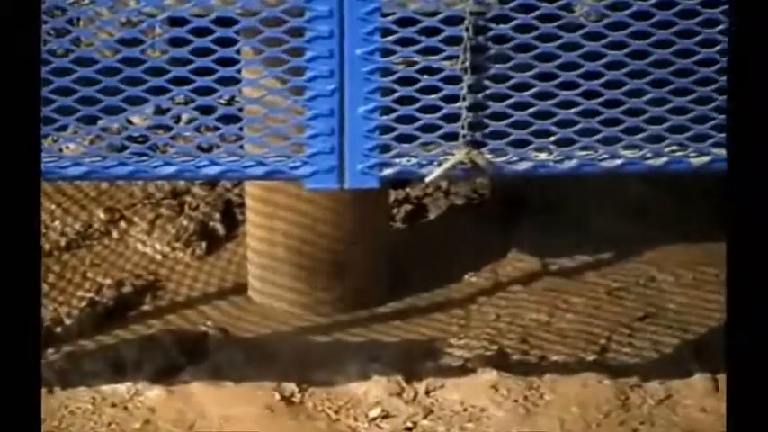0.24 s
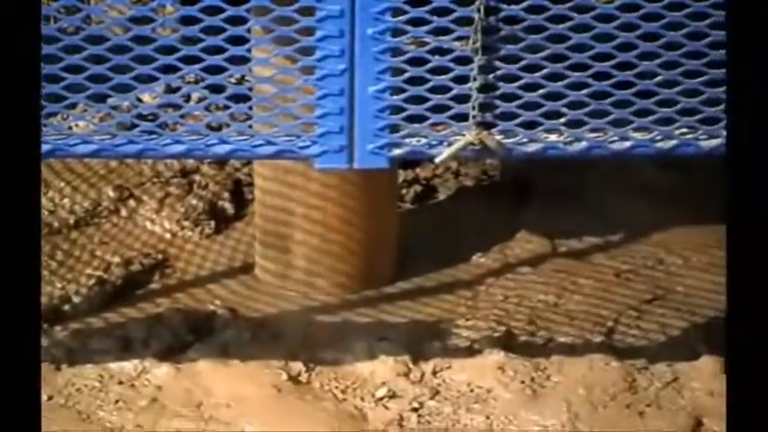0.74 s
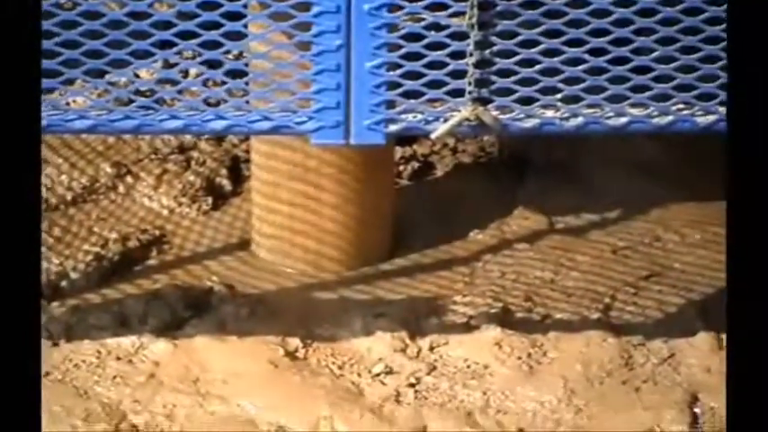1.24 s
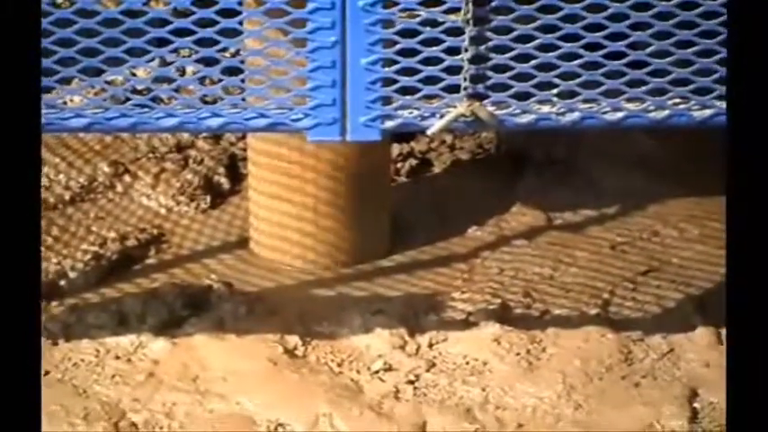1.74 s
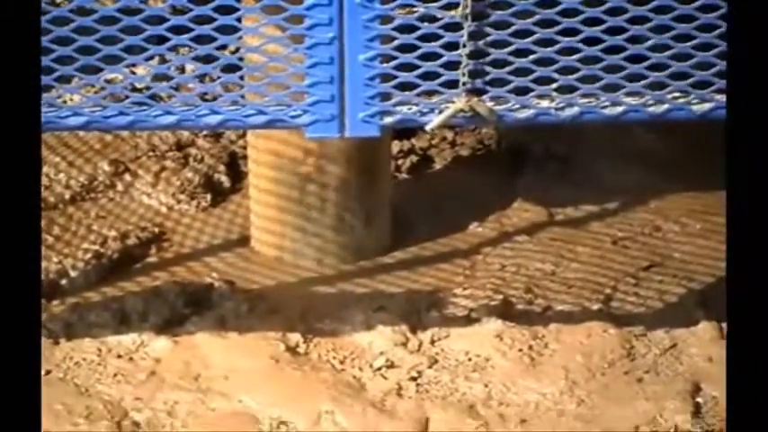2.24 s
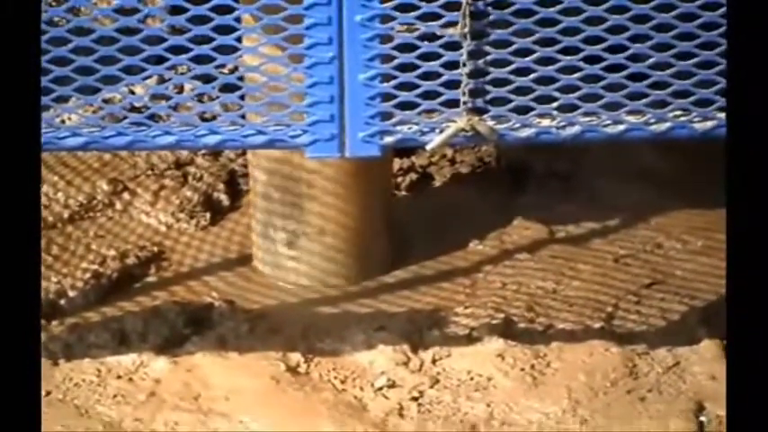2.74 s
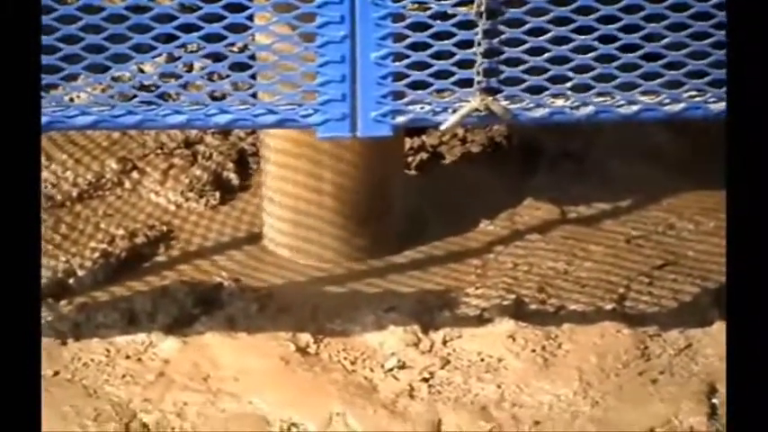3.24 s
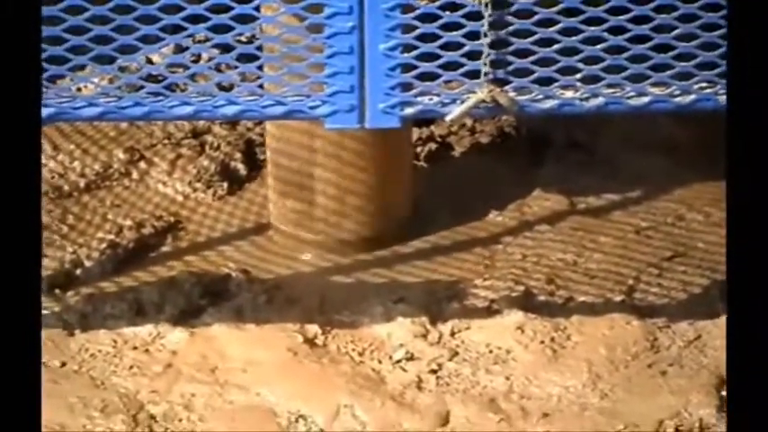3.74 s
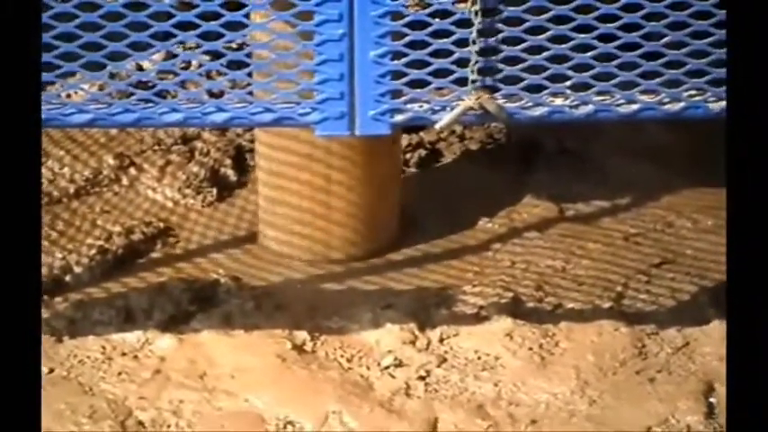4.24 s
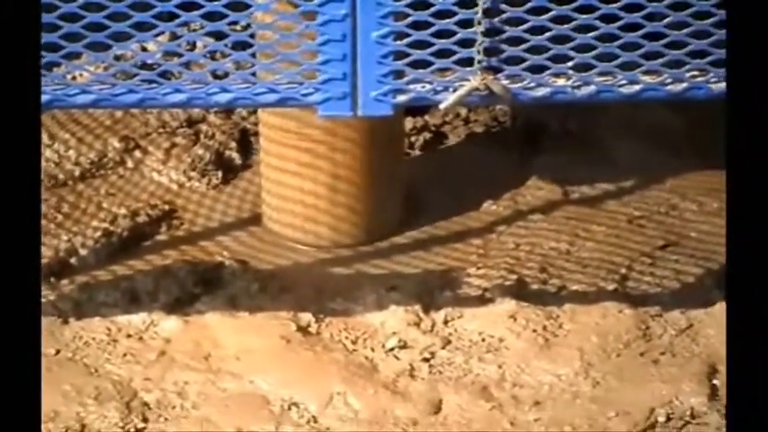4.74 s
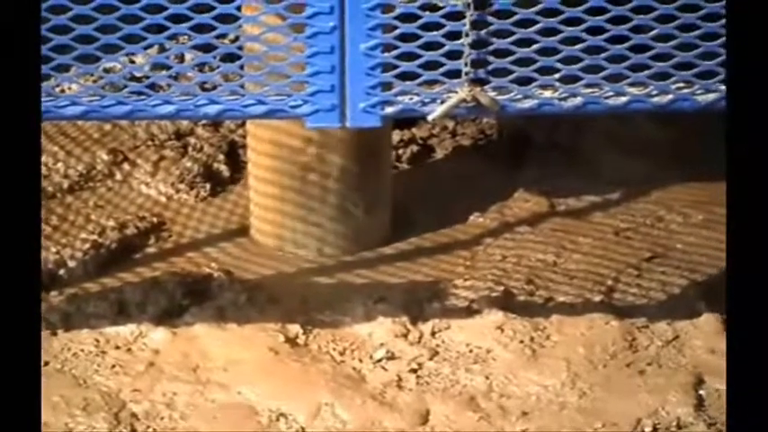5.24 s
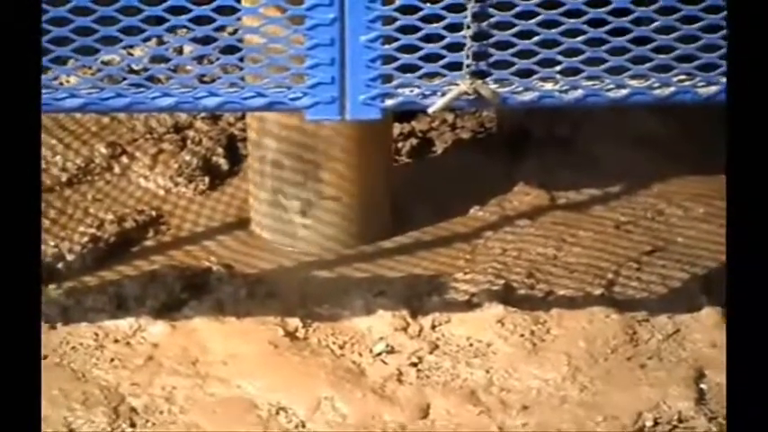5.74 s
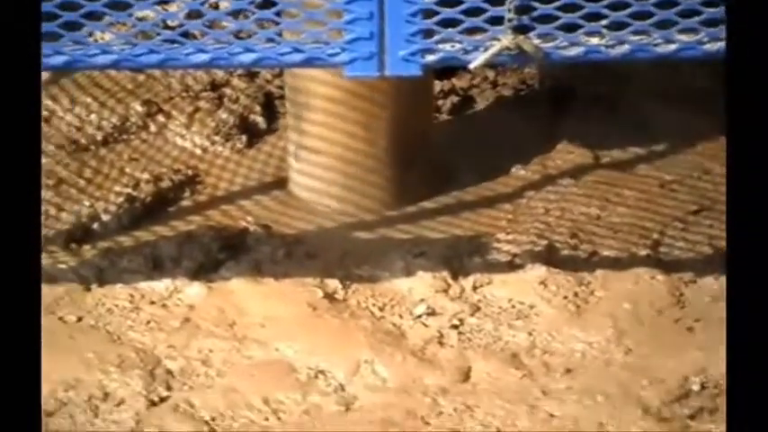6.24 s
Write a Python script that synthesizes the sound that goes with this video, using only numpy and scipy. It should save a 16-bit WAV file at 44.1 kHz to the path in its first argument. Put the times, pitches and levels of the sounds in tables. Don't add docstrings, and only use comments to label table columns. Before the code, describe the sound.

Outdoor drilling machinery heard fairly close on one microphone, starting suddenly after short silence. The diesel holds a constant low hum while rotary gears and a faltering hydraulic whine climb slightly, then fall back. Fluttering metallic roar and airy fan hiss fill the background. Soft casing knocks, tiny steel ticks and scratchy scuffs appear, then strong low wind bumps make the sound dip and recover.

```python
import sys
import numpy as np
from scipy import signal
from scipy.fft import rfft, irfft, next_fast_len
from scipy.io import wavfile

SR = 44100
rng = np.random.default_rng(int(sys.argv[2]) if len(sys.argv) > 2 else 0)


def to_wav(sig):
    pcm = np.clip(np.atleast_2d(sig), -1, 1) * 32767
    pcm = np.round(pcm).astype(np.int16)
    wavfile.write(sys.argv[1], SR, pcm.T)


def ratio_of_db(decibels):
    return 10 ** (np.asarray(decibels, float) / 20)


N = 286209


def rms_one(x):
    return x / np.sqrt(np.mean(x ** 2) + 1e-20)


def in_time(rows):
    s, *columns = np.transpose(rows)
    return [np.interp(np.arange(N) / SR, s, c) for c in columns]


def drift(rate):
    r = np.exp(-80 * np.pi * rate / SR)
    noise = rng.standard_normal(N // 40 + 2002)
    slow = signal.lfilter([1], [1, -2 * r, r * r], noise)[2000:]
    return np.interp(np.arange(N) / 40, np.arange(len(slow)), rms_one(slow))


def resonate(x, hz, width_hz):
    r = np.exp(-np.pi * width_hz / SR)
    feedback = [1, -2 * r * np.cos(2 * np.pi * hz / SR), r * r]
    return signal.lfilter([(1 - r * r) / 2, 0, (r * r - 1) / 2], feedback, x)


def narrow(rings):
    white = rng.standard_normal(N)
    out = np.zeros(N)
    for hz, width, db in rings:
        out += ratio_of_db(db) * rms_one(resonate(resonate(white, hz, width), hz, width))
    return out


def shape(points, size):
    hz, db = np.transpose(points)
    grid_hz = np.arange(size // 2 + 1) * SR / size + 1e-3
    return ratio_of_db(np.interp(np.log(grid_hz), np.log(hz), db, left=-90, right=-120))


def coloured(spectrum, low_hz, high_hz):
    size = next_fast_len(N)
    spec = shape(spectrum, size) * rfft(rng.standard_normal(size))
    inside = slice(round(low_hz * size / SR), round(high_hz * size / SR))
    return irfft(spec, size)[:N] * size / np.sqrt(2 * np.sum(np.abs(spec[inside]) ** 2))


def line(hz, level_db, waver_db, rate=5.8, slip=0.21):
    turns = np.cumsum(hz * np.ones(N)) / SR + rng.random()
    phase = 2 * np.pi * turns + slip * waver_db * drift(rate)
    strength = rms_one(ratio_of_db(waver_db * drift(rate)))
    return np.sqrt(2) * ratio_of_db(level_db) * strength * np.sin(phase)


def drive():
    # (time [s], gear mesh [Hz], mesh [dB rms], octave [dB rms], pump whine [dB rms])
    drive_curve = [(.4, 254.6, -21, -46, -30.5), (1.1, 255.5, -20, -52, -27),
                   (1.3, 254.2, -20.5, -40, -29.5), (2.2, 254.5, -20.5, -36.5, -32.5),
                   (2.6, 254.4, -21.5, -38, -31), (2.8, 258.6, -19, -39, -24.5),
                   (3.0, 263.4, -19.5, -34, -30), (3.4, 267.3, -19.5, -36.5, -40),
                   (3.75, 269.3, -20, -35.5, -37), (3.9, 271.5, -17.5, -46.5, -41),
                   (4.2, 274.5, -21.5, -40, -33), (4.5, 267, -21, -35, -33.5),
                   (4.9, 258.8, -20.5, -34, -28), (5.1, 255, -21, -49, -29.5), (5.6, 255, -21.5, -48, -30),
                   (6.45, 254.3, -22, -45.5, -27)]
    # (multiple of mesh, level [dB rms], waver [dB])
    shaft_lines = [(0.2939, -28, 1.5), (.421, -40, -5), (.59, -45.5, 1.5), (.874, -34, 4.5),
                   (1.181, -33.5, 2.5), (1.28, -41.5, 6.5)]
    # (time [s], share lost)
    falters = [(.59, .85), (1.21, .6), (1.58, .8), (2.19, .8), (2.86, .7), (3.2, .6), (5.02, .7),
               (5.34, .7), (5.94, .9), (6.22, .8), (6.37, .6)]
    falter_s = .045
    mesh_hz, mesh_db, octave_db, whine_db = in_time(drive_curve)
    out = line(mesh_hz, mesh_db, 0.88, rate=12.0, slip=0.084)
    out += line(2 * mesh_hz, octave_db, 2.0, slip=0.11)
    for multiple, db, waver_db in shaft_lines:
        out += line(multiple * mesh_hz, db, waver_db, slip=0.15)
    shaft_turns = np.cumsum(.01289 * mesh_hz) / SR
    throb = 1 - .35 * np.cos(2 * np.pi * (shaft_turns - .9))
    for s, lost in falters:
        throb = throb * (1 - lost * np.exp(-((np.arange(N) / SR - s) / falter_s) ** 2))
    return out + throb * line(2.374 * mesh_hz, whine_db, 1.7, rate=14.0, slip=0.2)


def diesel():
    # (frequency [Hz], level [dB rms], waver [dB])
    diesel_lines = [(60.0, -22.5, .8), (201, -37, 4), (842, -45, 6), (1003, -45, 6), (1090, -48, 6),
                    (1154, -47, 5), (1207, -47, 6)]
    return sum(line(hz, db, waver_db) for hz, db, waver_db in diesel_lines)


def roar():
    # (time [s], level above the mean [dB])
    roar_curve = [(.4, 0.55), (2.6, 1.03), (3.4, 1.16), (3.95, 2.5), (4.4, 2.5), (4.6, 1), (5.06, -0.5),
                  (5.6, -1.4), (6.0, -1.5), (6.45, -0.4)]
    # (time [s], level above the mean [dB])
    whistle_curve = [(.3, 1.5), (2.4, 1.5), (2.8, -5), (4.1, -8), (4.4, 0), (6.49, 1.5)]
    # (frequency [Hz], level [dB per Hz])
    body_colour = [(20, -6.5), (50, -6), (100, -11.5), (170, -17.5), (260, 4.5), (350, -7), (480, -4.5),
                   (540, -9.5), (640, -3.5), (780, -4), (950, -9), (1400, -10), (1750, -21.5), (3000, -32)]
    # (frequency [Hz], level [dB per Hz])
    hiss_colour = [(1000, -34.5), (1600, -2.5), (1750, -3.5), (2100, -2), (2890, -8), (3340, -9),
                   (3790, -13.5), (4650, -17), (5350, -16.5), (6500, -20), (8500, -36.5)]
    # (frequency [Hz], level [dB per Hz])
    air_colour = [(5000, -17), (6800, -4), (7800, -1), (9400, -3.5), (14000, -2.5)]
    # (frequency [Hz], width [Hz], level [dB rms])
    casing_rings = [(1310, 60, -46), (2010, 40, -53), (2206, 40, -51), (2488, 30, -54), (2610, 50, -55),
                    (3310, 50, -57), (3450, 60, -61)]
    # (frequency [Hz], width [Hz], level [dB rms])
    fan_whistles = [(8049, 70, -68), (8225, 70, -66), (8380, 70, -68), (9370, 100, -73), (10200, 120, -71),
                    (11810, 200, -72)]
    hiss_follows = 0.87
    (roar_db,), (whistle_db,) = in_time(roar_curve), in_time(whistle_curve)
    body = ratio_of_db(-29.5 + roar_db + 0.9 * drift(32.0)) * coloured(body_colour, 650, 2500)
    hiss_db = -44.5 + hiss_follows * roar_db
    hiss = ratio_of_db(hiss_db + 0.77 * drift(40.0)) * coloured(hiss_colour, 2880, 6500)
    air_db = -55.5 + .7 * roar_db + 0.49 * whistle_db
    air = ratio_of_db(air_db + 0.44 * drift(40.0)) * coloured(air_colour, 7100, 10800)
    rings = ratio_of_db(hiss_follows * roar_db) * narrow(casing_rings)
    return body + hiss + air + rings + ratio_of_db(whistle_db) * narrow(fan_whistles)


def wind():
    # (centre [s], half length [s], peak [dB])
    gust_events = [(0.326, 0.045, -22), (.47, .025, -29.5), (1.657, .025, -26.5), (1.848, .03, -28),
                   (2.002, .045, -22), (3.455, 0.041, -38.5), (4.53, .05, -18), (4.682, .06, -19),
                   (4.937, .015, -25.5), (5.069, 0.038, -17.5), (5.189, 0.022, -21), (5.228, 0.015, -12),
                   (5.345, 0.027, -25), (5.42, 0.06, -23), (5.563, 0.079, -28), (5.73, .04, -22),
                   (5.86, .06, -23.5), (6.028, .03, -31), (6.194, 0.029, -22), (6.45, .02, -32.5)]
    # (centre [s], peak [dB], pitch [Hz])
    puffs = [(4.451, -5.5, 318), (4.492, -8.5, 152), (4.552, -8.5, 200.5), (4.603, -7.5, 150),
             (4.667, -7.5, 202), (4.719, -12, 130), (5.066, -9, 180), (5.087, -6.5, 700), (5.202, -6, 420),
             (5.229, -0.5, 198), (5.233, -9.5, 400), (5.41, -15, 200.3), (5.741, -10, 253),
             (6.457, -17.5, 130), (5.347, -11.5, 140)]
    t = np.arange(N) / SR
    strength = ratio_of_db(-35 + 2 * drift(10.0))
    for s, half, db in gust_events:
        strength += ratio_of_db(db) * np.exp(-((t - s) / half) ** 2)
    rumble = coloured([(20, -2.5), (80, 1), (180, -2.5), (400, -13), (1000, -24)], 97, 190)
    out = strength * ratio_of_db(-3.5 + 2.6 * drift(33.0)) * rumble
    for s, db, hz in puffs:
        cycles = np.arange(-round(2 * SR / hz), round(2 * SR / hz)) * hz / SR
        swing = -np.sin(2 * np.pi * cycles) * np.exp(-2.5 * cycles ** 2)
        out[round((s - 2 / hz) * SR):][:len(swing)] += ratio_of_db(db) * swing
    return out


def knocks():
    # (time [s], peak [dB], frequency [Hz], fall by 60 dB [s])
    blows = [
        (.92, -20.5, 427, 0.11),
        (2.775, -17, 319, .08),
        (3.96, -16, 428, 0.14),
        (4.42, -18.5, 762, 0.17),
        (4.82, -19, 394, .2),
    ]
    out = np.zeros(N)
    for s, db, hz, t60 in blows:
        t = np.arange(round(t60 * SR)) / SR
        soft_start = np.clip(t / 0.0046, 0, 1)
        out[round(s * SR):][:len(t)] += ratio_of_db(db - 60 * t / t60) * soft_start * np.sin(2 * np.pi * hz * t)
    return out


def ticks():
    # (time [s], peak [dB], loss away from the main tone [dB per octave])
    strikes = [
        (.9612, -11.5, 0),
        (1.2017, -24, 25),
    ]
    # (frequency [Hz], level [dB], fall by 60 dB [s])
    steel_modes = [(3000, -7, .005), (5400, 0, .0035), (7100, 1, .0014), (9300, 1, .0014),
                   (12300, 1, .0014)]
    main_hz = steel_modes[1][0]
    out = np.zeros(N)
    for hz, mode_db, t60 in steel_modes:
        clicks = np.full(N, 1e-18)
        for s, db, loss_db in strikes:
            clicks[round(s * SR)] = ratio_of_db(db + mode_db - loss_db * abs(np.log2(hz / main_hz)))
        r, w = ratio_of_db(-60 / (t60 * SR)), 2 * np.pi * hz / SR
        out += signal.lfilter([0, np.sin(w)], [1, -2 * r * np.cos(w), r * r], clicks)
    return out


def scuffs():
    # (time [s], length [s], knock [dB rms], rasp [dB rms],
    # tilt from rasp to scratch and again to sizzle [dB])
    strokes = [(2.59, .045, -60, -55, 2.5), (2.76, .033, -25, -37, -5.5), (2.862, .018, -50, -45, -1.5),
               (3.138, .02, -38, -50, -6), (3.70, .025, -45, -43, -1.5), (3.735, .012, -38, -46, -8),
               (3.778, .022, -37, -40, -5), (3.80, .025, -45, -45, -.3), (3.845, .022, -50, -46, -.3),
               (3.955, .028, -28, -40, -12), (4.045, .028, -27, -42, -8), (4.186, .02, -36, -50, -7),
               (4.30, .04, -60, -58, 2.5), (4.47, .04, -33, -50, -5), (5.085, .006, -24, -48, -10),
               (5.231, .006, -26, -43, -8)]
    # (frequency [Hz], width [Hz], level [dB])
    groups = [
        [(1260, 250, 0), (2170, 350, -3)],
        [(3600, 1800, 0)],
        [(5300, 1800, 1.5)],
        [(7300, 4500, 0), (12000, 3000, -8)],
    ]
    grit = rng.standard_normal(N) * ratio_of_db(0.94 * rng.exponential(1, N))
    rung = []
    for group in groups:
        band = np.zeros(N)
        for hz, width, db in group:
            band += ratio_of_db(db) * rms_one(resonate(resonate(grit, hz, width), hz, width))
        rung.append(band)
    out = np.zeros(N)
    for s, length, knock_db, rasp_db, tilt_db in strokes:
        levels_db = knock_db, rasp_db, rasp_db + tilt_db, rasp_db + 2 * tilt_db - 2
        t = np.arange(round(2 * length * SR)) / SR
        stroke = 1.35 * np.clip(t / .002, 0, 1) * np.exp(-(t / length) ** 3)
        part = slice(round(s * SR), round(s * SR) + len(t))
        out[part] += stroke * sum(ratio_of_db(db) * rms_one(band[part]) for db, band in zip(levels_db, rung))
    return out


def scene():
    return (drive() + diesel() + roar() + wind() + knocks() + ticks() + scuffs())[None]


def roll_off(x):
    return signal.sosfilt(signal.butter(12, 13810, fs=SR, output="sos"), x)


def record(dry):
    # (time [s], level [dB], recovery [s])
    ducks = [
        (4.494, -2, 0.5),
        (5.236, -3.5, 0.38),
    ]
    # (frequency [Hz], level [dB])
    port = [(20, 0.5), (10100, -0.5), (10500, -8.5), (11050, -16.5), (11800, -10.5), (12600, -16.5),
            (13000, -23), (13500, -31), (14000, -46.5)]
    t = np.arange(N) / SR
    duck_db = np.zeros(N)
    for s, db, recover in ducks:
        duck_db += db * np.clip((t - s) / 0.005, 0, 1) * np.exp(-np.abs(t - s) / recover)
    rounded = 0.69 * np.tanh(dry * ratio_of_db(duck_db) / .7)
    size = next_fast_len(N)
    heard = irfft(rfft(rounded, size) * shape(port, size), size)[:, :N]
    start_s = .3095
    return roll_off(heard * np.clip((t - start_s) / 0.0011, 0, 1))


dry = scene()
out = record(dry)
to_wav(out)
```